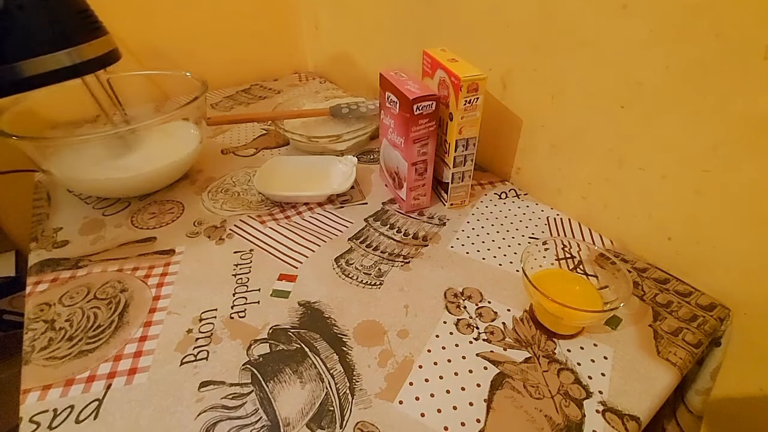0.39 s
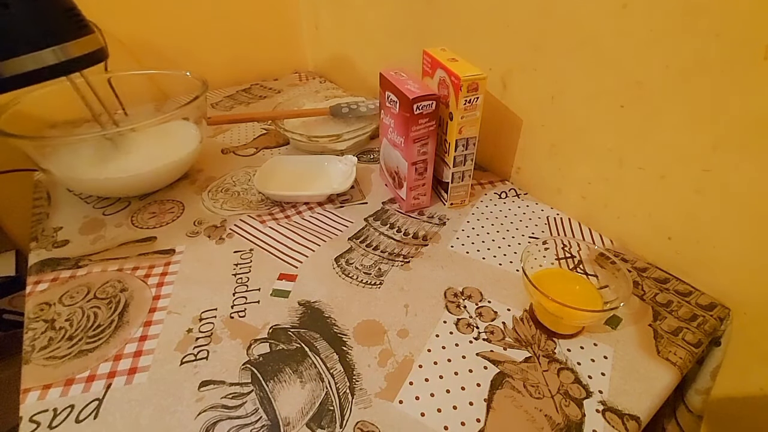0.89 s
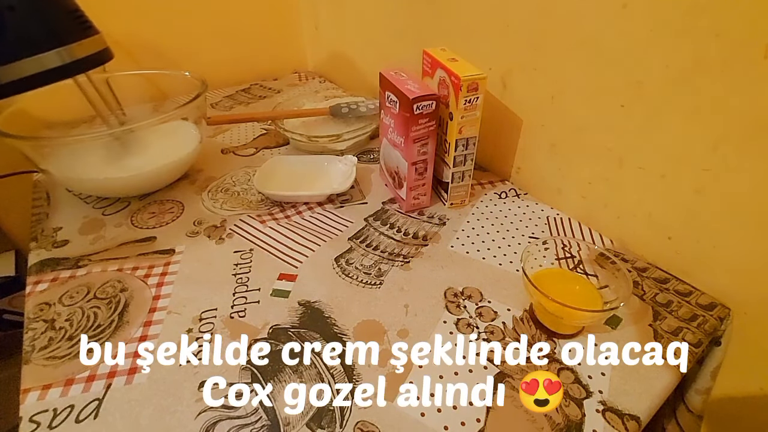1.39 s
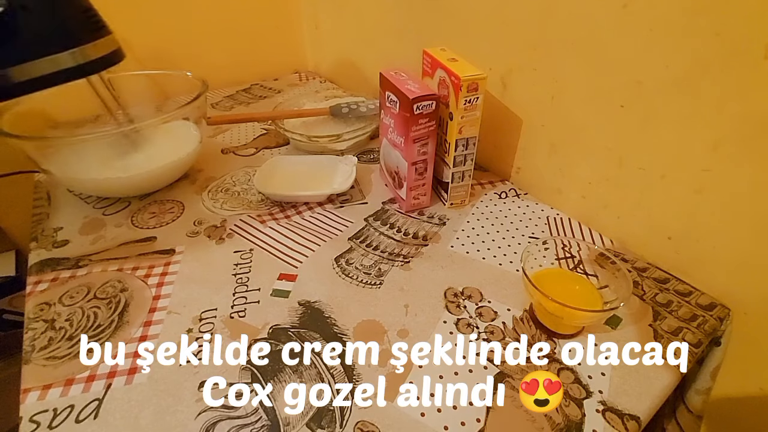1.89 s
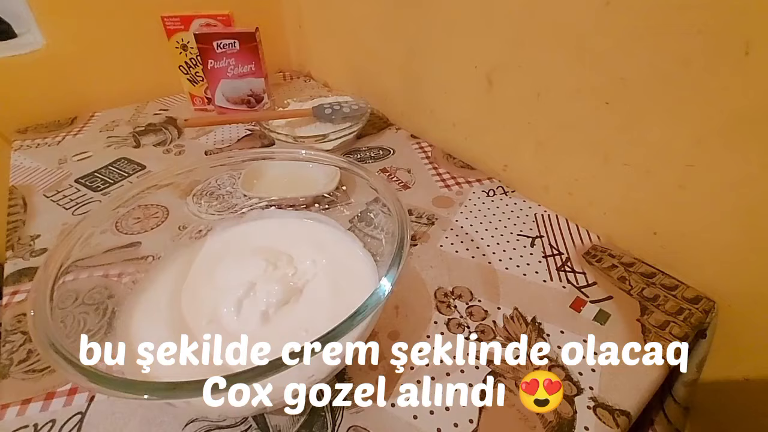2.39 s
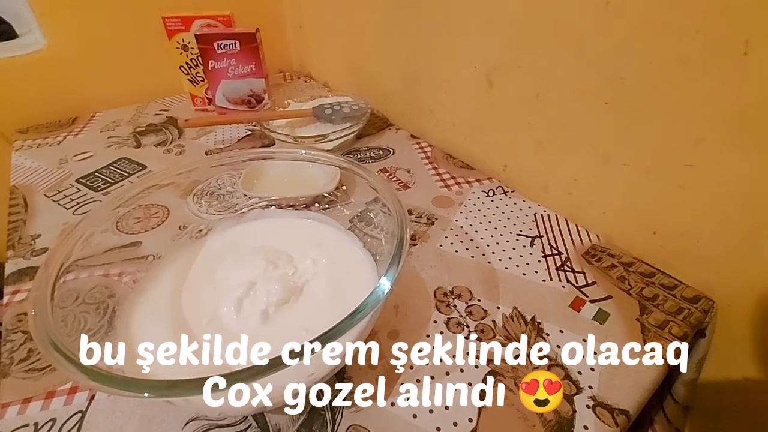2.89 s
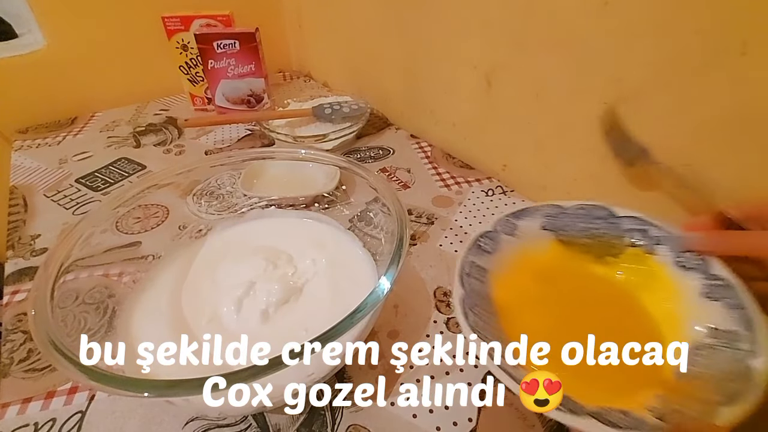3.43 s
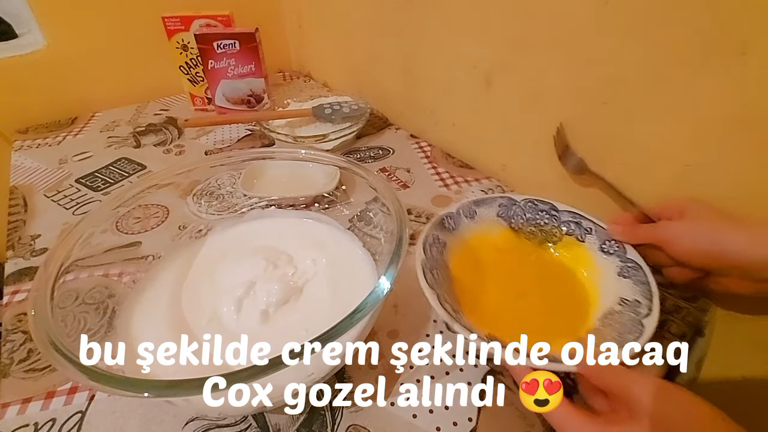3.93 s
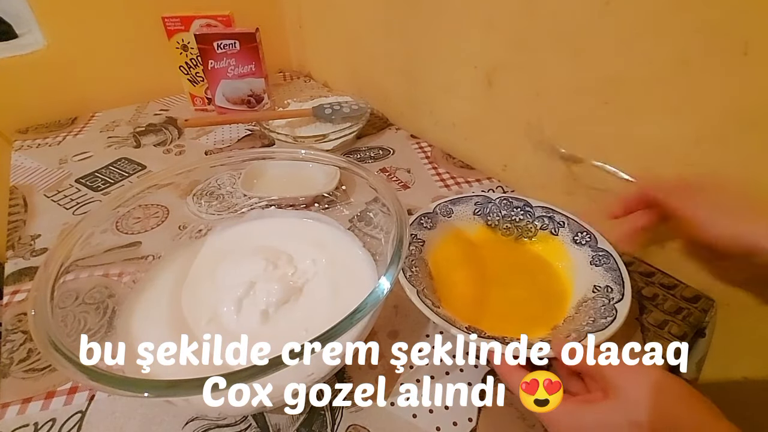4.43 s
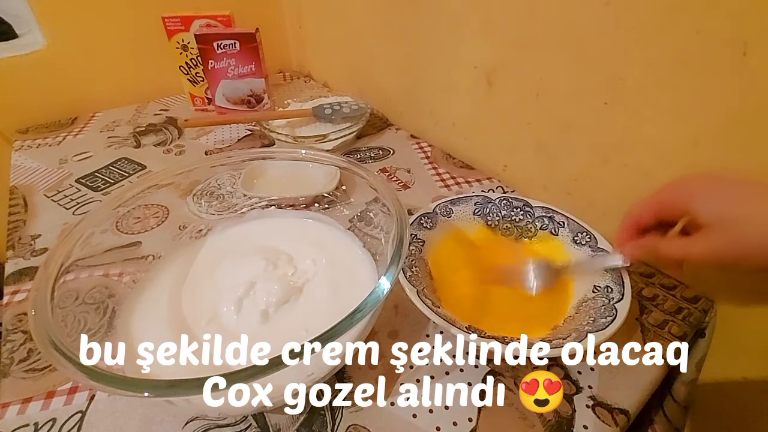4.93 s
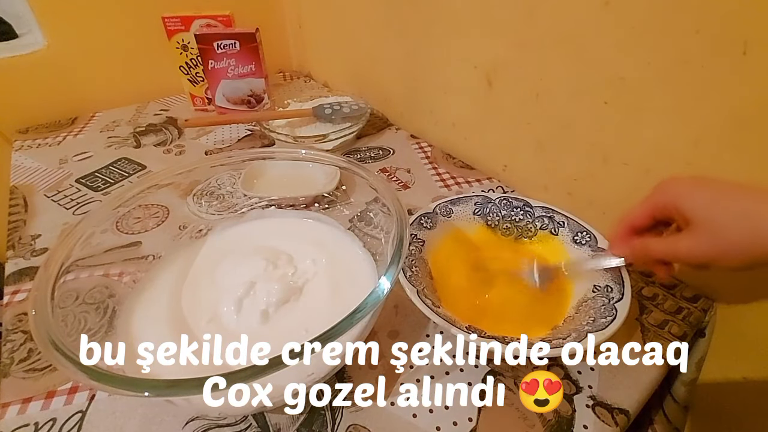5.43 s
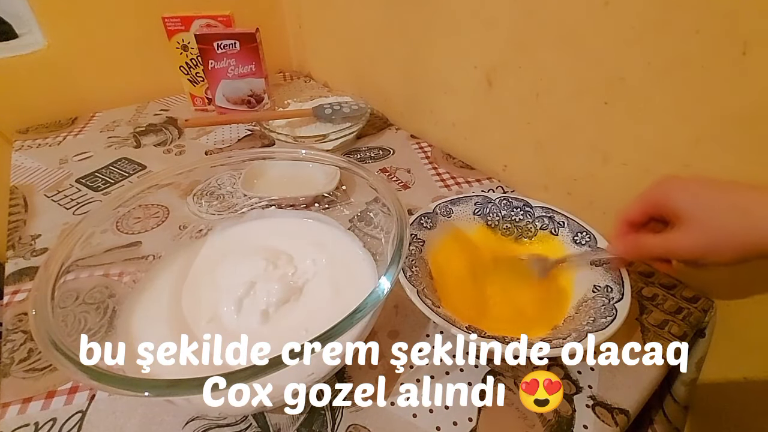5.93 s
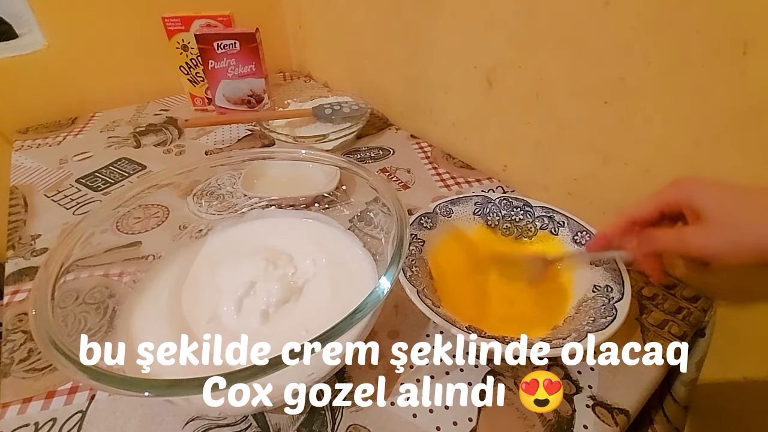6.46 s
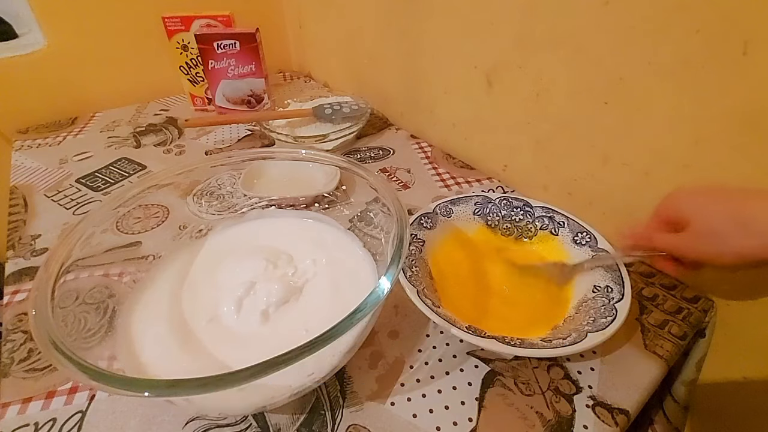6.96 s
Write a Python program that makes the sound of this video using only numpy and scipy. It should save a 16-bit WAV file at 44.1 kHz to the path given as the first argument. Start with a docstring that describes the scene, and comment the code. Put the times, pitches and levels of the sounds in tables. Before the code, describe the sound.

A loud, constant-speed mixer fills the first third with rushing motor noise, tonal whine and beaters brushing glass, growing buzzier when pressed down. A hard cut drops to soft room hum. There is rustling fabric, a sliding dish, dull low bumps, a brief steel scrape and a small metallic graze. Bright, short fork taps on an egg-filled china dish follow about five a second at first, then sparser, slightly right, with short room reflections.

```python
"""A hand mixer whirs in a glass bowl, left of centre, and breaks off at a cut to a quiet kitchen.
Cloth rustles, a dish drags and bumps, then a fork grazes, taps and stirs in it over an appliance hum.
The mixer is shaped noise, gear tones on one speed and glass rung once a turn; the fork rings damped
modes with noise cracks; cloth, drags and hum are noise bands. Two spaced microphone ports listen."""
import sys
import numpy as np
from scipy import signal
from scipy.fft import rfft, irfft, next_fast_len
from scipy.io import wavfile
from scipy.ndimage import uniform_filter1d, map_coordinates

SR = 44100
rng = np.random.default_rng(int(sys.argv[2]) if len(sys.argv) > 2 else 0)


def elevation(decibels):
    """Turn decibel levels (scalar or array-like) into linear amplitude ratios."""
    levels = np.asarray(decibels, float)
    return 10 ** (levels / 20)


def to_wav(sig):
    """Store sig (one row per channel, or 1-D mono) as 16-bit WAV at the path in sys.argv[1].

    Samples outside -1..1 are clipped; the rate is SR.
    """
    pcm = np.clip(np.atleast_2d(sig), -1, 1) * 32767
    pcm = np.round(pcm).astype(np.int16)
    wavfile.write(sys.argv[1], SR, pcm.T)  # frames by channels


N = 312228
TIME = np.arange(N) / SR  # s

# How alike the two ports hear the quiet kitchen. Each row: frequency in Hz, left-right likeness (0 to 1).
LIKENESS = [(60, 0.97), (290, 0.94), (640, 0.075), (3000, 0)]
# Colour of cloth and of the stirring fork. Each row: frequency in Hz, relative level in dB per Hz.
RUSTLE_COLOUR = [(880, -52), (1500, -23), (2060, -6), (9470, -5), (12500, -12), (16000, -16.5)]


def unit(x):
    """Scaled to rms 1."""
    return x / np.sqrt(np.mean(x ** 2) + 1e-20)


def along(points, hz):
    """Reads (Hz, value) points on a log frequency axis."""
    f, v = np.transpose(points)
    return np.interp(np.log(hz + 1), np.log(f + 1), v)


def colour(points):
    """A gain of frequency drawn through (Hz, dB) points."""
    return lambda hz: elevation(along(points, hz))


def wobble(rate):
    """A smooth random curve, rate knots a second."""
    return map_coordinates(rng.standard_normal(int(N * rate / SR) + 4), [np.arange(N) * rate / SR])


def filtered(x, response):
    """x times a complex response of frequency."""
    m = next_fast_len(x.shape[-1] + 8192)
    spectrum = rfft(x, m) * response(np.fft.rfftfreq(m, 1 / SR))
    return irfft(spectrum, m)[..., :x.shape[-1]]


def rush(gain, alike, lag_s=0):
    """Stereo noise of rms 1 whose mid/side balance sets the likeness; the right port hears it lag_s late."""
    def mid_side(hz):
        turn = np.arccos(np.clip(along(alike, hz), -1, 1)) / 2
        return gain(hz) * [np.cos(turn), np.sin(turn)]

    mid, side = filtered(rng.standard_normal((2, N)), mid_side)
    pair = np.array([mid + side, mid - side])
    return unit(filtered(pair, lambda hz: np.exp(np.outer([1j, -1j], np.pi * hz * lag_s))))


def patchy(x, depth_db):
    """Random patches of gain in time and frequency."""
    z = signal.stft(x, nperseg=512)[2]
    field = uniform_filter1d(rng.standard_normal(z.shape[1:]), size=3, axis=0)
    field = uniform_filter1d(field, size=9, axis=1)
    return unit(signal.istft(z * elevation(depth_db * unit(field)), nperseg=512)[1][:, :N])


def strokes(rows, rise, fall):
    """Gain of strokes that swell by rise dB a second, hold, and die by fall dB a second."""
    gain = 0
    for s, hold, db in rows:
        swell = rise * np.clip(s - TIME, 0, None)
        decay = fall * np.clip(TIME - s - hold, 0, None)
        gain = gain + elevation(db - swell - decay)
    return gain


def ring(modes, t, scatter_db):
    """Damped sines from (Hz, dB, t60 s) modes, at new strengths for each blow."""
    return sum(elevation(db + scatter_db * rng.normal() - 60 * t / t60) * np.sin(2 * np.pi * hz * t)
               for hz, db, t60 in modes)


def add(out, s, sound):
    """Mixes a sound in at time s."""
    at = out[..., round(s * SR):][..., :sound.shape[-1]]
    at += sound[..., :at.shape[-1]]


def room(x, wet_db):
    """The direct sound and a fresh diffuse noise tail for each port, dying at its own rate per frequency."""
    # Reverberation. Each row: frequency in Hz, t60 in seconds.
    reverb = [(200, 0.59), (2000, 0.24), (15000, 0.26)]
    hz, t, z = signal.stft(rng.standard_normal((2, SR // 2)), SR, nperseg=256)
    tail = signal.istft(z * elevation(-60 * t / along(reverb, hz)[:, None]), SR, nperseg=256)[1]
    tail = np.pad(tail, ((0, 0), (260, 0))) / np.linalg.norm(tail[0])
    direct = np.pad(x, (0, tail.shape[1] - 1))
    return direct + elevation(wet_db) * signal.fftconvolve(x[None], tail, axes=1)


def motor_noise(hum_db, near):
    """Fan rush and housing roar, noise through the shell resonances, growing slightly with pressure."""
    # Air pushed by the fan. Each row: frequency in Hz, relative level in dB per Hz.
    fan_colour = [(470, -28.5), (800, -1), (942, -7), (1480, 0), (1680, -3), (2570, -0.5), (3300, -3),
                  (4240, -2.5), (7450, -9), (9300, -13), (12300, -12), (15800, -16)]
    # Low roar of the housing. Each row: frequency in Hz, relative level in dB per Hz.
    roar_colour = [(18, -54), (30, -25), (129, -10.5), (251, -13.5), (340, -9), (679, -3), (851, -15.5),
                   (1100, -15.5), (1430, -49), (2420, -120)]
    # Shell resonances and dips. Each row: centre in Hz, width in Hz, boost in dB.
    housing = [(297, 12, 5), (339, 18, 8.5), (402, 10, 7.5), (446, 7, 8.5), (460, 8, -8), (476, 10, 4),
               (499, 13, 4), (1290, 30, -4), (1455, 20, 6), (2773, 16, 4), (548, 12, 4), (641, 20, 2.5),
               (2560, 140, 3), (5750, 120, 5)]

    def shell(hz):
        return elevation(sum(db / (1 + (2 * (hz - c) / w) ** 2) for c, w, db in housing))

    pressure_db = hum_db + 39.5  # over the hum of a firm pressure
    fan_db = -22.5 + 0.043 * pressure_db + 0.33 * wobble(30) + 0.69 * wobble(300)
    roar_db = -25 + 0.18 * pressure_db + 0.95 * wobble(60)
    fan = rush(lambda hz: colour(fan_colour)(hz) * shell(hz), near, lag_s=0.00027)
    roar = rush(lambda hz: colour(roar_colour)(hz) * shell(hz), near, lag_s=0.00025)
    return elevation(fan_db) * patchy(fan, depth_db=1.52) + elevation(roar_db) * patchy(roar, depth_db=1.5)


def gear_tones(gear):
    """Sines at whole multiples of the gear phase, the fifth being a high whine, the first the strongest."""
    # Other orders of the gear tone. Each row: multiple, mean level in dB.
    overtones = [(1, -30.5), (3, -45), (6, -40), (10, -52.5), (12, -46), (18, -57.5)]
    tones = 0
    for order, db in [(5, -35)] + overtones:
        # each port hears the tone through its own drifting mix of reflections
        flutter = np.array([wobble(7.8), wobble(13)])
        phase = 2 * np.pi * order * gear + 0.55 * flutter[::-1]
        tones = tones + elevation(db + 2.5 * flutter) * np.sin(phase)
    return tones


def beater_ticks(turn):
    """Once a turn the beater brushes the bowl and rings the damped modes of its glass."""
    # Mixing bowl. Each row: frequency in Hz, relative level in dB, t60 in seconds.
    glass = [(1340, -5, .025), (4650, 0, .025), (6200, -6, .02), (7330, 0, .045), (8100, -7, .04)]
    # Spells of harder brushing. Each row: time of full level in seconds, hold in seconds, level in dB.
    brushes = [(.85, 0.043, -27.5), (1.4, 0.17, -22), (2.1, 0.42, -25)]
    brush = elevation(-42) + strokes(brushes, rise=97, fall=170)
    ticks, t = np.zeros((2, N)), np.arange(SR // 10) / SR
    for i in np.flatnonzero(np.diff(np.floor(turn))):
        add(ticks, i / SR, room(brush[i] * ring(glass, t, scatter_db=2), wet_db=-3))
    return ticks


def table_hum(hum_db, turn):
    """Eight blade passes a turn shake the table; half that order and a higher rattle join in."""
    blades = 2 * np.pi * turn + 0.17 * wobble(12)
    rattle = elevation(-7.5) * np.sin(21 * blades)
    shake = np.sin(8 * blades) + elevation(-17) * np.sin(4 * blades) + rattle
    return elevation(hum_db + 1.6 * wobble(25)) * shake


def mixer():
    """Motor noise, gear tones, glass ticks and table hum, all tied to one speed and one pressure."""
    # How hard the mixer bears on the bowl. Each row: time in seconds, mean table hum in dB.
    press = [(0, -45), (.2, -46.5), (.41, -33.5), (.46, -51), (.68, -49.5), (.74, -42.5), (1.37, -32),
             (1.69, -45), (1.93, -43), (2.06, -23.5), (2.43, -24.5)]
    # Likeness of the nearby mixer at the ports. Each row: frequency in Hz, direct share (0 to 1).
    near = [(60, 1), (190, 1), (300, 0.32), (700, 0.54), (1500, 0.36), (15000, 0.037)]
    # Lean towards a side. Each row: frequency in Hz, left-right difference in dB.
    lean = [(150, -.3), (700, 4), (2400, .8), (6000, 1), (10000, -2.5)]
    press_s, press_db = np.transpose(press)
    hum_db = np.interp(TIME, press_s, press_db)
    gear = np.cumsum(693.6 + 0.3 * wobble(3)) / SR  # cycles of a drifting tooth rate in Hz
    turn = gear / 43 + 0.37  # 43 teeth
    # pressed to the bowl, the beater makes the glass sing
    song = elevation(hum_db - 17.5) * rush(lambda hz: 1 / (1 + ((hz - 7330) / 30) ** 2), near)
    sides = motor_noise(hum_db, near) + gear_tones(gear) + beater_ticks(turn) + song
    leaning = filtered(sides, lambda hz: elevation(np.outer([0.5, -0.5], along(lean, hz))))
    return leaning + table_hum(hum_db, turn)  # the hum stays centred


def fork_taps():
    """Each tap: a short noise crack, ringing tines and egg-damped china, the room, a thud in the table."""
    # Taps. Each row: time in seconds, dry peak in dB, rim ring in Hz, tine ring in Hz,
    # tine level in dB over the china.
    taps = [(5.032, -18.5, 2064, 6300, 16.5), (5.225, -31, 2016, 6595, 15), (5.421, -21.5, 1974, 5075, 6),
            (5.6068, -23, 1960, 5060, 11), (5.8031, -24.5, 2038, 5086, 6), (6.234, -20.5, 1898, 3607, 9),
            (6.4397, -31.5, 2006, 5830, 6), (6.85, -24, 1980, 4825, 4)]
    # Firm taps reach the table. Each row: time in seconds, level in dB.
    thuds = [(5.032, -39), (5.421, -41), (5.608, -46), (6.234, -39.5), (6.85, -46)]
    # Modes of the dish. Each row: frequency in Hz, relative level in dB, t60 in seconds.
    china = [(328, -23.5, 0.051), (1182, -11, 0.0086), (3545, -8.5, 0.025), (4580, -5, 0.024),
             (5150, -9.5, 0.03), (6940, -10.5, 0.01), (11600, -6, 0.015)]
    # Colour of the contact noise. Each row: frequency in Hz, relative level in dB per Hz.
    crack_colour = [(410, -73), (700, -33), (1300, -20), (1680, -60), (1970, -6.5), (2660, -21.5),
                    (3500, -13.5), (6150, -10), (8500, -9), (16000, -15.5)]
    out, t = np.zeros((2, N)), np.arange(SR // 5) / SR
    rise = np.clip(t / 0.003, 0, 1) ** 3
    for s, db, rim_hz, tine_hz, tine_db in taps:
        crack = unit(filtered(rng.standard_normal(len(t)), colour(crack_colour)))
        crack = crack * elevation(9.5 - 60 * t / 0.014)  # t60 in s
        modes = china + [(rim_hz, -9, 0.041), (tine_hz, tine_db, 0.01)]
        blow = rise * (crack + ring(modes, t, scatter_db=2))
        heard = room(elevation(db) * blow / np.abs(blow).max(), wet_db=2)
        add(out, s - 0.0018, elevation([[-0.3], [0.3]]) * heard)  # a touch to the right
    for s, db in thuds:
        thud = ring([(135, 0, 0.15), (60, -6, 0.15)], t, scatter_db=2)
        add(out, s, elevation(db) * thud * (1 - np.exp(-t / 0.008)))
    # a bowl alongside rings low once
    add(out, 5.425, elevation(-66) * ring([(603, 0, 0.35)], t, scatter_db=0))
    return out


def fork_graze():
    """The fork grazes a rim: bursts of noise, heard bright and through the ringing cutlery."""
    # Grazes. Each row: time of full level in seconds, hold in seconds, level in dB before the ringing.
    clink = [(4.255, .13, -78), (4.302, .008, -66), (4.319, .002, -57), (4.331, .008, -54)]
    # Modes of the fork. Each row: frequency in Hz, relative level in dB, t60 in seconds.
    cutlery = [(980, -7, .1), (1502, -8, .36), (2681, -7, .15), (3984, 6, .075), (5600, -9, .03)]
    t = np.arange(SR // 5) / SR
    graze = strokes(clink, rise=4000, fall=900) * rng.standard_normal((2, N))
    rung = signal.fftconvolve(graze, ring(cutlery, t, scatter_db=0)[None], axes=1)[:, :N]
    bright = filtered(graze, lambda hz: along([(600, 0), (5000, 1), (9000, 0.3), (16000, 0.1)], hz))
    return elevation(-26) * rung + elevation(4) * bright


def fork_drags():
    """Steel squeaks over china and drags through the egg: swelling noise bands of uneven level."""
    # The fork first catches. Each row: time of full level in seconds, hold in seconds, level in dB.
    catch = [(3.73, 0, -58)]
    # Steel slides on china. Each row: time of full level in seconds, hold in seconds, level in dB.
    scrape = [(3.8, 0.047, -69)]
    # Bands of the slide. Each row: centre in Hz, width in Hz, relative level in dB.
    squeak = [(4400, 800, -3), (7420, 70, 4), (11400, 400, -7), (13000, 200, -8)]
    # Drags through the egg. Each row: time of full level in seconds, hold in seconds, level in dB.
    stir = [(5.3, 0.081, -75), (6.5, 0.059, -80.5)]
    # Faint high flicks between taps. Each row: time of full level in seconds, hold in seconds, level in dB.
    flicks = [(5.35, 0.0017, -67), (5.387, 0.0037, -67), (5.573, 0, -74)]

    def bands(hz):
        return sum(elevation(db) / (1 + (2 * (hz - c) / w) ** 2) for c, w, db in squeak)

    slide_gain = strokes(catch, rise=9000, fall=1200) + strokes(scrape, rise=156, fall=65)
    slide = slide_gain * elevation(2.5 * wobble(29.64)) * rush(bands, LIKENESS)
    stir_gain = strokes(stir, rise=49, fall=97) * elevation(1.4 * wobble(15))
    stirring = stir_gain * rush(colour(RUSTLE_COLOUR), LIKENESS)
    high = rush(lambda hz: 1 / (1 + ((hz - 7800) / 900) ** 4), LIKENESS)
    return slide + stirring + strokes(flicks, rise=1900, fall=1500) * high


def cloth():
    """Cloth rustles in uneven grains of noise and the dish drags over it in a lower band."""
    # Rustles of cloth. Each row: time of full level in seconds, hold in seconds, level in dB.
    rustles = [(2.512, 0.078, -65), (2.62, 0.044, -64.5), (2.79, 0.041, -74), (2.99, 0, -72),
               (3.08, .06, -74), (3.33, 0, -68)]
    # The dish over the cloth. Each row: time of full level in seconds, hold in seconds, level in dB.
    drags = [(2.66, 0.026, -64), (2.79, 0.063, -60.5), (2.99, .04, -59)]
    grains = patchy(rush(colour(RUSTLE_COLOUR), LIKENESS), depth_db=3.5)
    rustle = strokes(rustles, rise=900, fall=75) * elevation(2.2 * wobble(77)) * grains
    # (Hz, linear gain); a negative gain only flips the phase
    drag_gain = [(200, -8.5), (370, 7.0), (500, 1.2), (900, 3.04), (1400, 0.6), (2100, 2.85), (2500, -2.5)]
    low = rush(lambda hz: along(drag_gain, hz), LIKENESS)
    return rustle + strokes(drags, rise=94, fall=41) * elevation(1.6 * wobble(40)) * low


def bumps():
    """Soft bumps boom: a damped sine with a noise band around it that dies twice as fast."""
    # Bumps on floor and table. Each row: time in seconds, level in dB, frequency in Hz, t60 in seconds.
    blows = [(2.753, -32, 96, 0.16), (2.79, -31.5, 54.8, 0.48), (2.758, -39.5, 210, 0.15),
             (2.984, -40, 381, 0.066), (2.999, -37.5, 186, 0.21), (3.026, -41, 377, 0.08),
             (3.766, -33.5, 111, 0.13), (4.196, -37.5, 116, 0.14)]
    out, t = np.zeros((2, N)), np.arange(SR // 2) / SR
    for s, db, hz, t60 in blows:
        boom = unit(filtered(rng.standard_normal(len(t)), lambda f: f / hz / (1 + (f / hz) ** 4)))
        note = ring([(hz, 0, t60)], t, scatter_db=0) + elevation(-5 - 120 * t / t60) * boom
        add(out, s, elevation(db) * (1 - np.exp(-t / 0.0051)) * note)
    return out


def kitchen():
    """Low room noise, hiss, and the appliance hum as narrow bands of noise that waver."""
    # Low room noise. Each row: frequency in Hz, relative level in dB per Hz.
    floor_colour = [(15, -58), (25, -8.5), (143, -11), (216, -9.5), (295, -22.5), (327, -26), (546, -35.5),
                    (1500, -39), (1950, -77.5), (3300, -120)]
    # Room hiss. Each row: frequency in Hz, relative level in dB per Hz.
    hiss_colour = [(900, -34), (1500, -11), (2600, -10.5), (5000, -14.5), (7500, -7), (12000, -5),
                   (16000, -13.5)]
    # Hum bands. Each row: centre in Hz, width in Hz, level in dB.
    hum = [(51, 13, -59), (139.2, 14, -71), (202.9, 8.9, -55), (268.4, 6.8, -67), (390, 13, -82.5)]
    # The strongest hum band swells once. Each row: time of full level in seconds, hold in seconds, level in dB.
    swell = [(4.25, 0.049, -50.5)]
    out = elevation(-59.5) * rush(colour(floor_colour), LIKENESS)
    out += elevation(-75) * rush(colour(hiss_colour), LIKENESS)
    for c, w, db in hum:
        level = elevation(db) + (150 < c < 230) * strokes(swell, rise=310, fall=220)
        out += level * rush(lambda hz: 1 / (1 + (2 * (hz - c) / w) ** 4), LIKENESS)
    return out


def hiss_puffs():
    """The hiss puffs faintly every 0.2325 s, with a soft diffuse tail."""
    out, t = np.zeros((2, N)), np.arange(SR // 20) / SR
    puff_gain = [(1500, 0.14), (2300, 0.98), (7000, 0.57), (12000, 0.25)]  # (Hz, linear gain)
    for s in np.arange(2.62, N / SR, 0.2325):
        puff = unit(filtered(rng.standard_normal(len(t)), lambda hz: along(puff_gain, hz)))
        shape = elevation(-66 - 60 * t / 0.15) * (1 - np.exp(-t / 0.0097))
        add(out, s, room(shape * puff, wet_db=6))
    return out


def ports(x):
    """The colour of the microphone, and a steep end of the treble near 15.9 kHz."""
    # Weak in the deep bass, deaf in one treble band. Each row: frequency in Hz, gain in dB.
    mic = [(28, -6.5), (48, -1), (7500, 0), (9400, -7.5), (11200, -2)]
    return filtered(x, lambda hz: colour(mic)(hz) / (1 + (hz / 15900) ** 140))


def scene():
    """The mixer, a cut, then the quiet kitchen leaning slightly right."""
    before = np.clip((2.436 - TIME) / 0.0015, 0, 1)  # the cut and its fade, in s
    fork = fork_taps() + fork_graze() + fork_drags()
    quiet = kitchen() + hiss_puffs() + cloth() + bumps() + fork
    return before * ports(mixer()) + (1 - before) * elevation([[-0.5], [0.5]]) * ports(quiet)


def band_limit(x):
    """A steep low-pass at the top of the band."""
    return signal.sosfilt(signal.butter(12, 16420, fs=SR, output="sos"), x)


def record(dry):
    """The finished mix."""
    return band_limit(dry)


dry = scene()
out = record(dry)
to_wav(out)
```